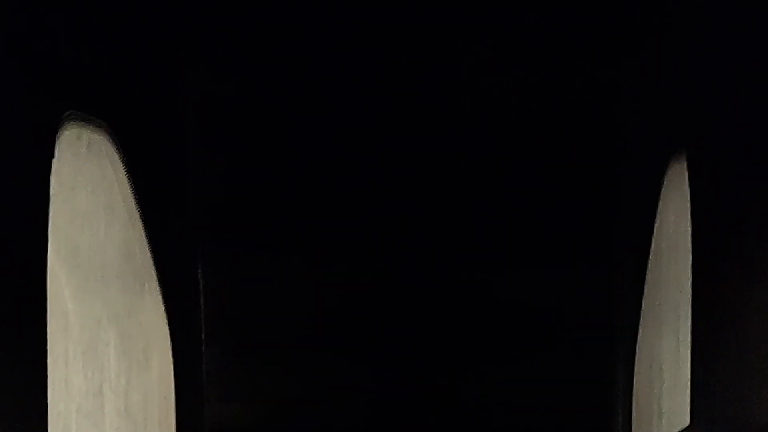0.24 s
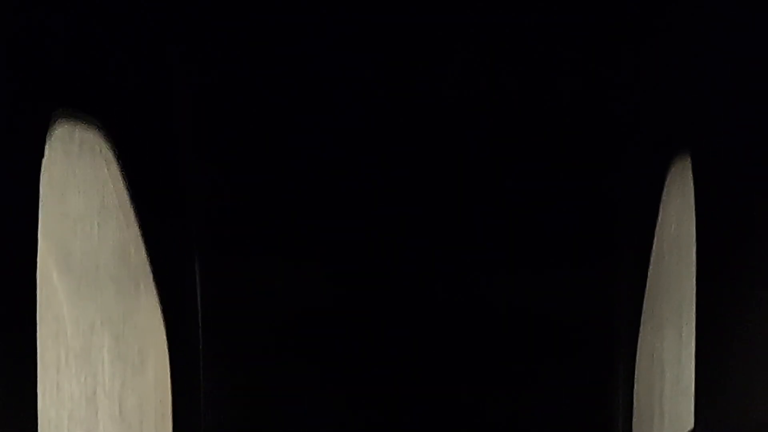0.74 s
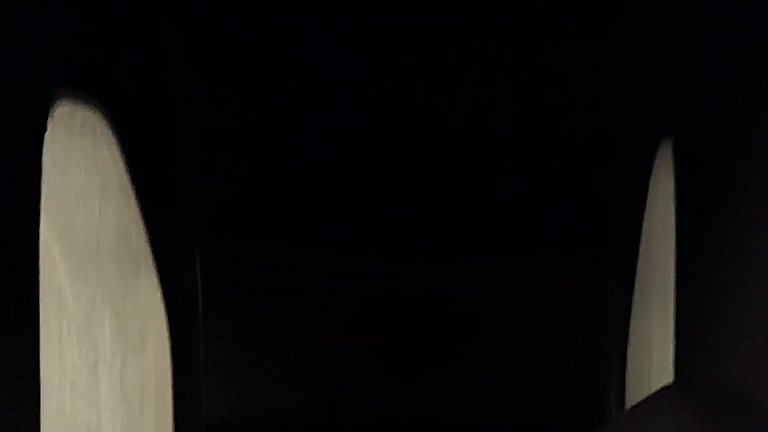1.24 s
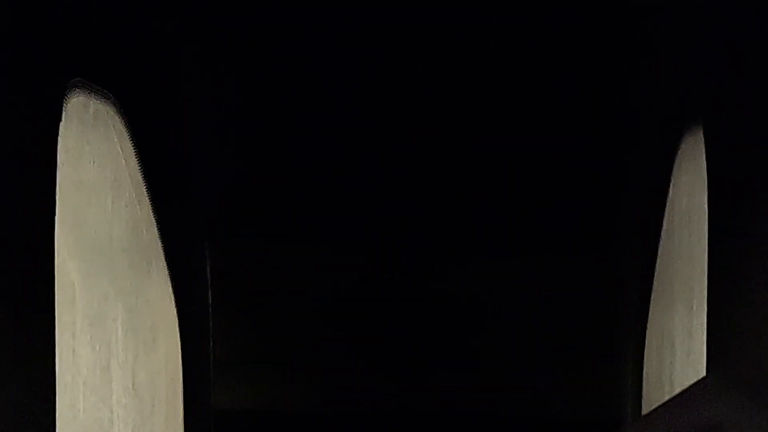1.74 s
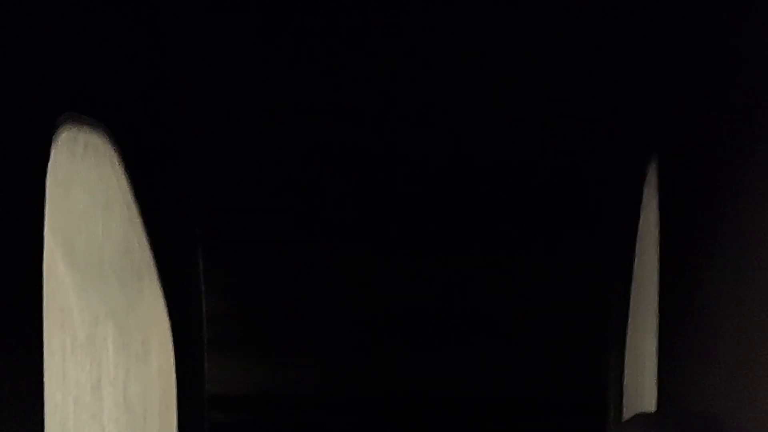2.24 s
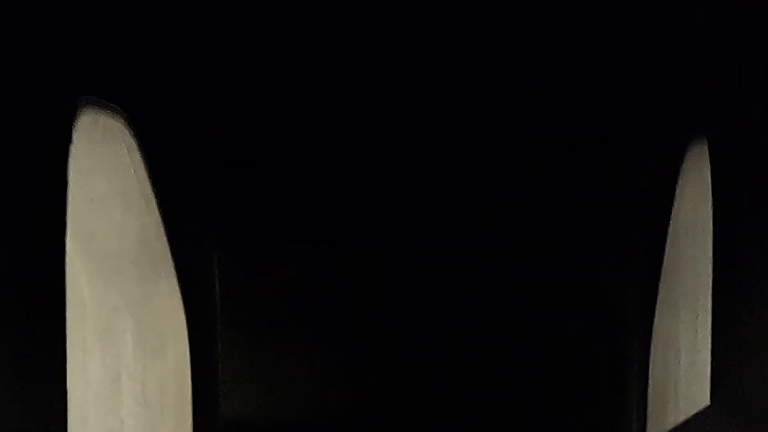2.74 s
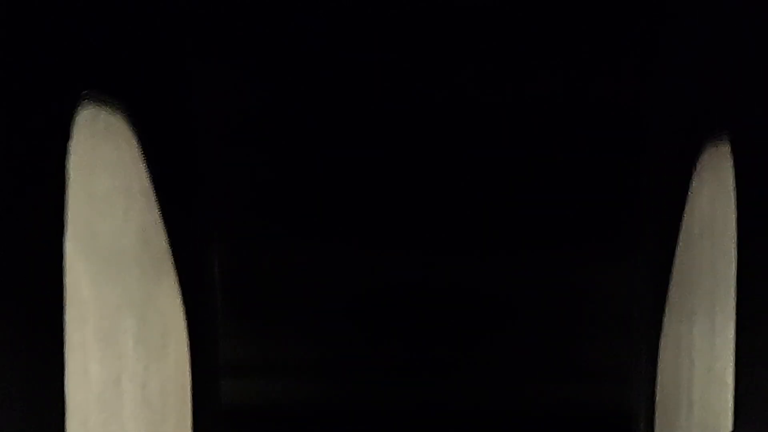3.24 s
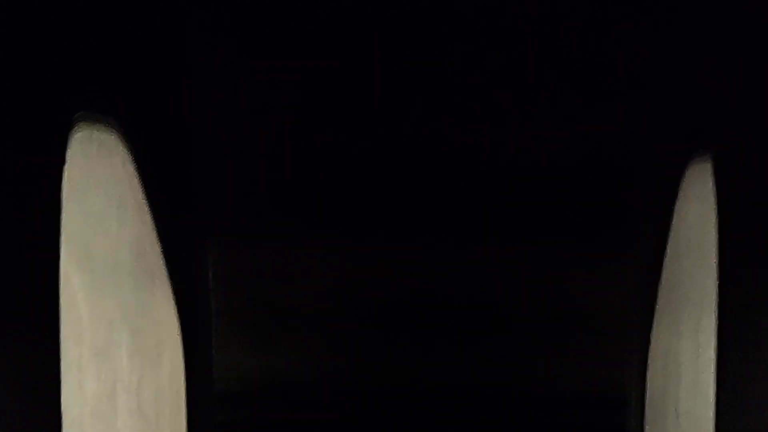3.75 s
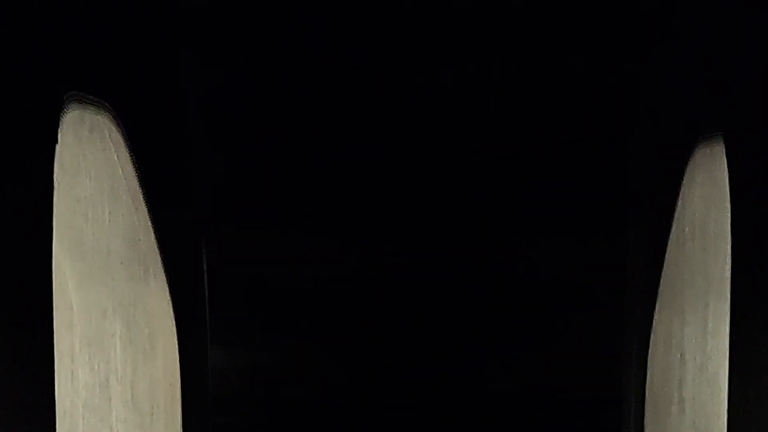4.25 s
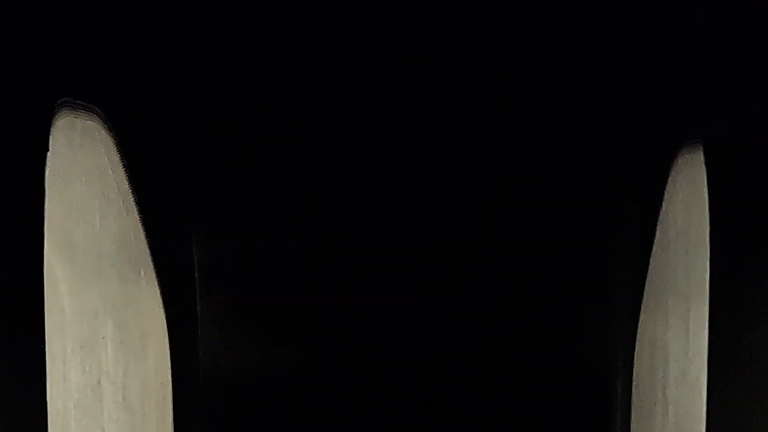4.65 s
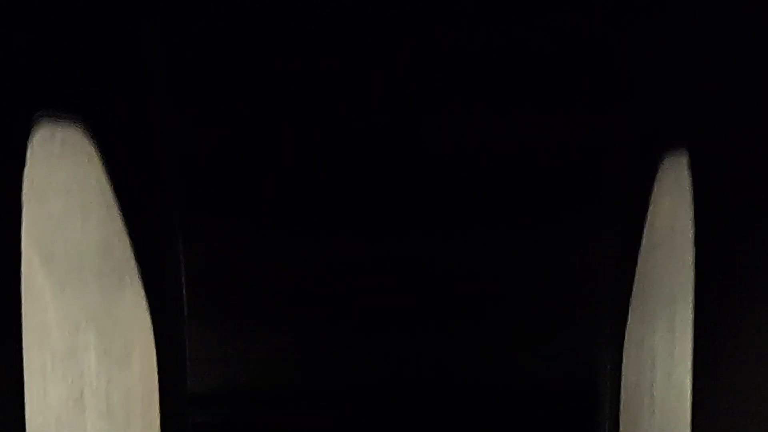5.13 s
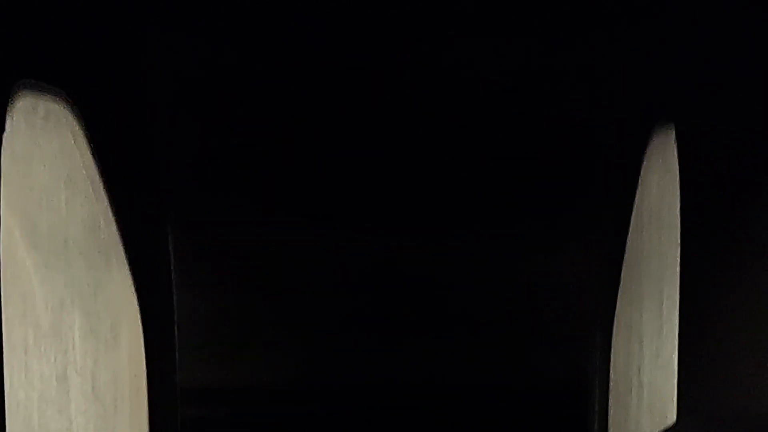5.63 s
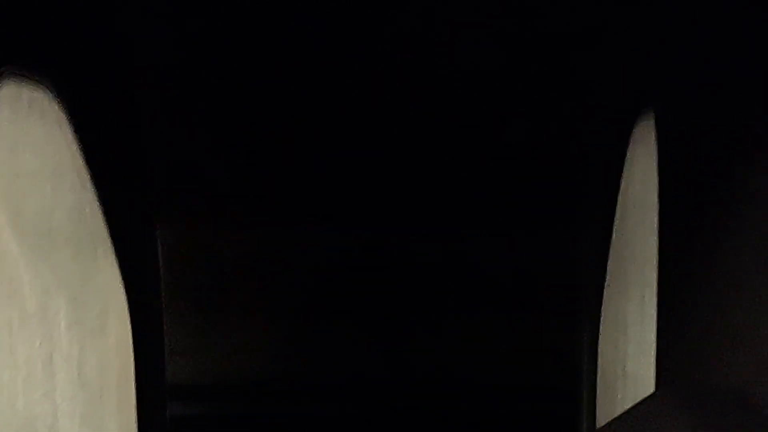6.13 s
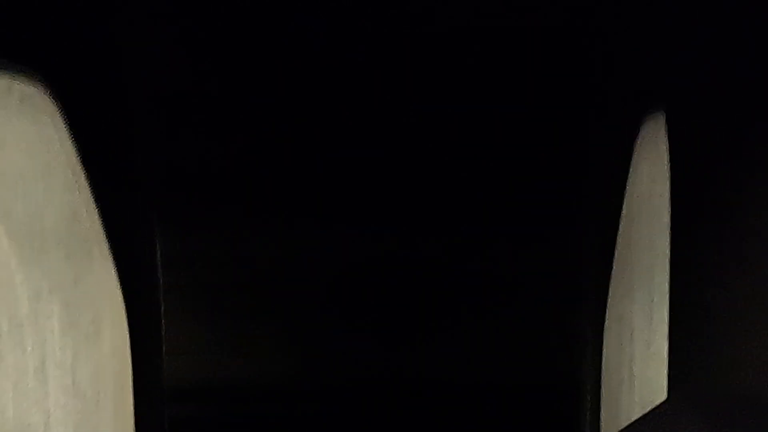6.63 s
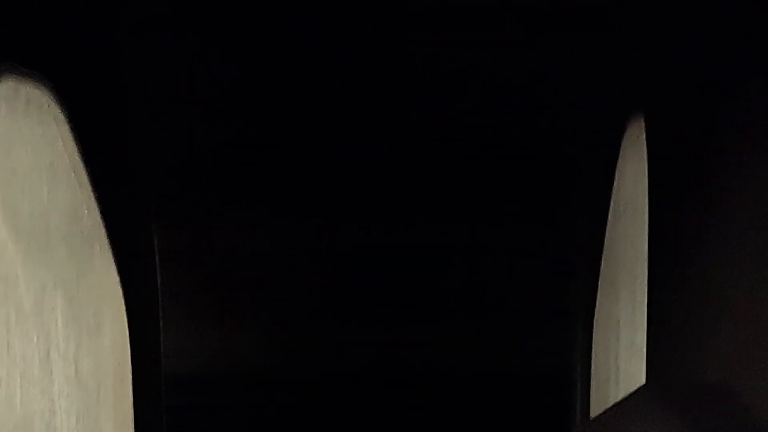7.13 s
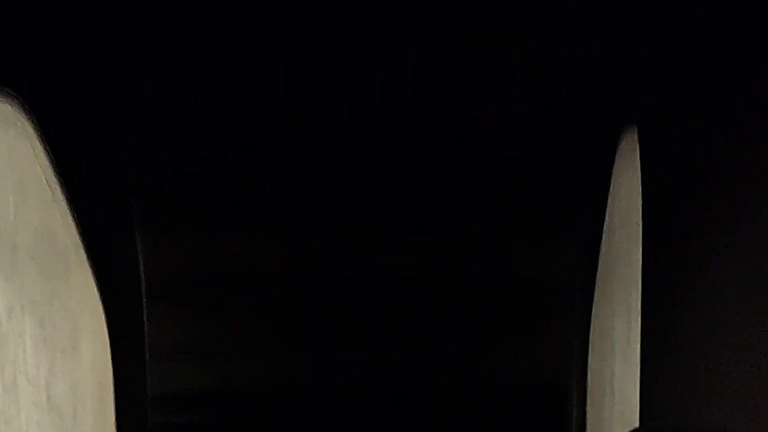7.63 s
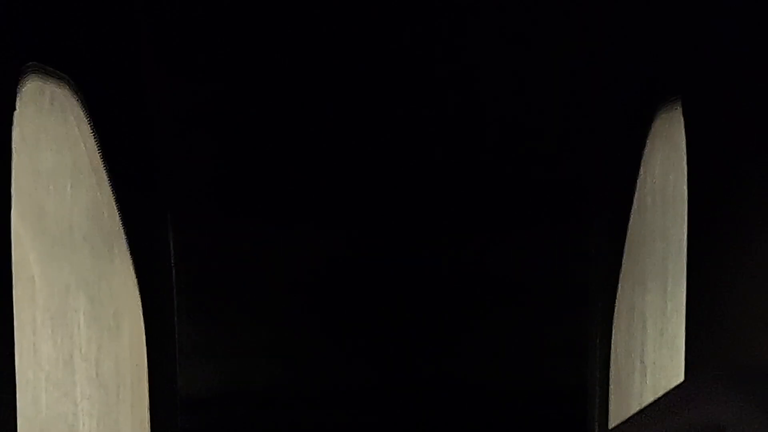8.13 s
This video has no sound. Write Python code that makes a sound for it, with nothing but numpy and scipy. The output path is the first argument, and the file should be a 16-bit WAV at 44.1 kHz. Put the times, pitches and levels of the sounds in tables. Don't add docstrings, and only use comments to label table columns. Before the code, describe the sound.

Inside a subway car running fast through a tunnel. A deep, unsteady rumble and floor boom fill everything from the first instant, with rough wheel roar and a blurred metallic ring above. Thin motor and gear whines surface and sink, air hisses softly, and loose panels tick. A small overloaded microphone briefly ducks the sound under pressure buffets. It ends still at speed.

```python
import sys
import numpy as np
from scipy import signal
from scipy.fft import rfft, irfft, next_fast_len
from scipy.io import wavfile
from scipy.ndimage import uniform_filter1d

SR = 44100
rng = np.random.default_rng(int(sys.argv[2]) if len(sys.argv) > 2 else 0)


def persist_wave(psi):
    counts = np.round(np.clip(psi, -1, 1) * 32767).astype(np.int16)
    wavfile.write(sys.argv[1], SR, np.atleast_2d(counts).T)


def field_ratio(decibels):
    return 10 ** (np.asarray(decibels, dtype=float) / 20)


N = 369558
STEADY_SHARE = 0.65


def rms_one(x):
    return x / np.sqrt(np.mean(x ** 2) + 1e-20)


def in_time(rows):
    s, *columns = np.transpose(rows)
    return [np.interp(np.arange(N) / SR, s, column) for column in columns]


def swells(s, length_s, db):
    t = np.arange(0, N + 200, 200) / SR
    bells = np.exp(-np.log(16) * ((t[:, None] - s) / length_s) ** 2)
    return np.interp(np.arange(N) / SR, t, bells @ db)


def swells_of(rows):
    return swells(*np.transpose(rows))


def drift(rate):
    r = np.exp(-80 * np.pi * rate / SR)
    coarse = rng.standard_normal(N // 40 + 2002)
    slow = signal.lfilter([1], [1, -2 * r, r * r], coarse)[2000:]
    return np.interp(np.arange(N) / 40, np.arange(len(slow)), rms_one(slow - slow.mean()))


def resonate(x, hz, width_hz):
    r = np.exp(-np.pi * width_hz / SR)
    zeros = np.array([1, 0, -1]) * (1 - r * r) / 2
    return signal.lfilter(zeros, [1, -2 * r * np.cos(2 * np.pi * hz / SR), r * r], x)


def resonate_twice(x, hz, width_hz):
    return resonate(resonate(x, hz, width_hz), hz, width_hz)


def steadied(x, share):
    power = uniform_filter1d(uniform_filter1d(x * x, size=3000), size=3000)
    return x * (power.mean() / (power + 1e-30)) ** (share / 2)


def coloured(spectrum, patchy_db, count, share=0):
    size = next_fast_len(N)
    hz, level_db = np.transpose(spectrum)
    pitch = np.log(np.maximum(np.arange(size // 2 + 1) * SR / size, 1))
    gain = field_ratio(np.interp(pitch, np.log(hz), level_db, left=-90, right=-90))
    shaped = rfft(rng.standard_normal(size)) * gain
    place = (pitch - np.log(hz[0])) / np.log(hz[-1] / hz[0]) * (count - 1)
    total = np.zeros(N)
    for k in range(count):
        band = irfft(shaped * np.clip(1 - abs(place - k), 0, 1), size)[:N]
        if share:
            band = steadied(band, share)
        total += band * field_ratio(patchy_db * drift(9.1))
    return rms_one(total)


def through_walls(x, cut_hz):
    return signal.sosfilt(signal.butter(4, cut_hz, fs=SR, output="sos"), x)


def wavering(hz, level_db, tremble_hz, beat_db):
    phase = 2 * np.pi * np.cumsum(hz + tremble_hz * drift(14.66)) / SR
    return field_ratio(level_db + beat_db * drift(12)) * np.sqrt(2) * np.sin(phase)


# (frequency [Hz], density [dB per Hz])
HISS_SPECTRUM = [(1200, -11), (2300, 0.5), (3200, -1.5), (4500, -16), (5500, -14.5), (7000, -23.5),
                 (8000, -27.5), (9000, -36), (12000, -47.5), (12700, -55), (13500, -66.5)]


def air_hiss(draught_db):
    return field_ratio(-40 + draught_db) * coloured(HISS_SPECTRUM, patchy_db=0.7, count=4)


# (time [s], pitch [Hz])
MOTOR_PITCH = [(0, 1910), (1.3, 1890), (2.9, 1873), (4.45, 1876), (5.5, 1866), (6.0, 1874), (6.5, 1866),
               (7.7, 1887), (8.38, 1863)]
# (time [s], length [s], level [dB])
MOTOR_PULLS = [
    (.2, .5, 3),
    (1.35, 0.65, 8.5),
    (2.194, 0.28, 11),
    (2.85, 0.44, 10),
    (4.46, 0.22, 11.5),
    (4.797, 0.37, 10.5),
    (5.42, 0.28, 7),
    (5.68, .2, 6),
    (6.55, .3, 8),
    (7.7, 0.18, 9.5),
]


def motor():
    pitch_hz, = in_time(MOTOR_PITCH)
    return wavering(pitch_hz, -44.5 + swells_of(MOTOR_PULLS), tremble_hz=7, beat_db=2.5)


GEAR_REST_DB = [-44, -44.5, -49, -52]
# (time [s], length [s], level [dB])
GEAR_MESHES = [
    [(.2, .9, 2.5), (.95, .4, 3.5), (2.0, 0.73, 2.5), (2.5, 0.5, 4), (3.25, 0.21, 1), (4.55, .5, 5),
     (6.4, 0.57, 0), (7.8, .5, 5)],
    [(.3, 0.47, 16), (.85, 0.59, 8.5), (2.3, 0.91, 9), (4.55, 0.6, 13.5), (5.55, 0.37, 10),
     (6.45, 0.81, 8.5), (7.7, 0.31, 15.5), (8.1, 0.36, 2)],
    [(.4, .3, 3), (2.4, 0.64, 7), (5.85, .25, 7.5), (6.8, 0.56, 16), (7.35, .2, 11), (7.7, 0.53, 11)],
    [(1.0, 1, 10), (2.6, 0.45, 9), (4.7, 0.75, 11.5), (5.4, 0.42, 14.5)],
]
# (frequency [Hz], width [Hz], group [index])
GEAR_TONES = [(450, 8, 0), (518, 8, 0), (584, 9, 1), (622, 8, 0), (948, 8, 2), (1188, 14, 3), (1220, 14, 3)]


def gears():
    levels_db = [rest_db + swells_of(rows) for rest_db, rows in zip(GEAR_REST_DB, GEAR_MESHES)]
    tones = 0
    for hz, width_hz, group in GEAR_TONES:
        tones = tones + wavering(hz, levels_db[group], tremble_hz=width_hz * 0.75, beat_db=2.5)
    return tones


# (frequency [Hz], width [Hz], resting level [dB])
WALL_MODES = [(747, 150, -37), (967, 210, -41)]
# (time [s], length [s], level [dB])
WALL_DRONES = [
    [(.47, .1, 12), (.66, .1, 12.5), (1.05, .15, 7), (1.2, .08, 10), (2.05, .25, 9), (2.6, .1, 4),
     (3.85, .1, 14), (4.55, .15, 7), (4.85, .1, 2), (5.07, .15, 9.5), (5.5, .1, 4), (6.1, .15, 0),
     (7.25, .1, 10), (7.9, .15, 8), (8.15, .1, 10)],
    [(.4, .2, 7), (3.4, .2, 7), (4.3, .1, 6), (5.0, .2, 1), (5.6, .3, 9.5), (6.2, .3, 8), (6.55, .3, 10.5),
     (6.95, .2, 13.5), (7.3, .4, 7), (7.72, .12, 13), (8.1, .3, 8), (8.32, .1, 11)],
]


def side_walls():
    drones = 0
    for (hz, width_hz, rest_db), rows in zip(WALL_MODES, WALL_DRONES):
        mode = resonate_twice(rng.standard_normal(N), hz, width_hz)
        drones = drones + field_ratio(rest_db + swells_of(rows)) * rms_one(steadied(mode, STEADY_SHARE))
    return drones


# (time [s], length [s], level [dB])
PANEL_DRONES = [(.1, 0.25, 11.5), (.45, .15, -2), (.9, 0.25, 11), (1.3, 0.31, 12.5), (1.602, 0.2, 7.5),
                (1.85, 0.14, 12), (2.52, .14, 8.5), (2.8, 0.16, 3), (3.35, .2, 11.5), (4.9, .2, 8.5),
                (5.05, 0.11, 7), (5.3, 0.12, -1), (5.55, 0.12, 4), (5.88, 0.085, 5), (6.18, 0.067, 12),
                (6.48, .1, 1.5), (6.602, .3, 9), (7.3, 0.17, 5.5), (8.2, .2, -2)]


def floor_panel():
    drone = resonate_twice(rng.standard_normal(N), hz=287.6, width_hz=118)
    return field_ratio(-36 + swells_of(PANEL_DRONES)) * rms_one(steadied(drone, STEADY_SHARE))


# (time [s], panel ring level [dB], upper ring level [dB], buzz [ms])
PANEL_KNOCKS = [(.107, -17, -34, 6.6), (.385, -16, -34, 5), (.499, -15, -33, 5), (.54, -20, -33, 5),
                (.697, -17, -35, 5), (2.233, -16, -34, 4), (2.495, -11, -34, 4), (2.855, -15, -34, 4),
                (3.842, -14, -33, 4), (5.085, -15, -33, 4), (5.845, -16, -33, 4), (5.898, -16, -34, 4),
                (7.735, -13, -34, 4), (8.3, -20, -33, 4), (1.034, -14, -34, 6), (1.066, -11, -32, 8),
                (1.122, -13, -32, 8), (1.589, -7, -29, 7.2), (2.157, -20, -36, 5), (3.092, -12, -37, 7),
                (3.355, -17, -37, 8), (3.384, -9, -36, 5), (3.448, -13, -33, 3), (3.895, -20, -30, 4),
                (3.967, -16.5, -35, 9), (4.111, -14.5, -29, 3), (4.2, -12, -36, 5), (4.306, -15, -36, 3),
                (5.111, -15, -31, 4), (6.473, -12, -32, 5), (6.669, -20, -32, 5), (6.859, -11, -36, 6),
                (6.987, -16, -27, 3.3), (7.037, -9, -30, 1.6), (7.054, -19, -34, 2), (7.058, -12, -21, 1.8),
                (7.0635, -13, -27, 2), (7.076, -16, -31, 2), (7.087, -14, -20.5, 1.2), (7.283, -16, -27, 8),
                (7.504, -14, -36, 4)]


def knocks():
    rattle_per_s, rattle_db, rattle_bright_db, rattle_buzz_ms = 70, -36, -17, 2.3
    spread_db = 3 * np.minimum(rng.exponential(1, N), 2.5)
    touched = rng.random(N) < rattle_per_s * field_ratio(5 * drift(2)) / SR
    touches = field_ratio(rattle_db + spread_db) * touched
    fade = np.exp(-1000 / (rattle_buzz_ms * SR))
    panel = signal.lfilter([np.sqrt(1 - fade ** 2)], [1, -fade], touches + 1e-18)
    upper = panel * field_ratio(rattle_bright_db)
    after = np.arange(SR // 20)
    for s, panel_db, upper_db, buzz_ms in PANEL_KNOCKS:
        buzz = np.exp(-1000 * after / (buzz_ms * SR))
        buzz = buzz / np.sqrt(buzz @ buzz)
        at = int(s * SR)
        panel[at:at + len(after)] += field_ratio(panel_db) * buzz
        upper[at:at + len(after)] += field_ratio(upper_db) * buzz
    chatter = rng.choice([-1, 1], (2, N))
    dull = resonate(resonate(panel * chatter[0], 2300, 1800), 2700, 1900)
    bright = resonate(resonate(upper * chatter[1], 4700, 1500), 5200, 2400)
    body = resonate(resonate(panel * chatter[1], 1400, 900), 1500, 1200)
    dull = field_ratio(17) * through_walls(dull, cut_hz=4200)
    bright = field_ratio(14) * through_walls(bright, cut_hz=7500)
    body = field_ratio(16.5) * through_walls(body, cut_hz=2600)
    return dull + bright + body


# (frequency [Hz], width [Hz], level [dB])
WHEEL_MODES = [(1730, 230, -6), (1872, 267, 2.5), (3678, 390, -13), (5440, 420, -39.5)]


def wheels(load_db):
    rough = rng.standard_normal(N)
    rings = 0
    for hz, width_hz, db in WHEEL_MODES:
        rings = rings + field_ratio(db + 0.68 * drift(9.2)) * resonate_twice(rough, hz, width_hz * 1.36)
    return field_ratio(-28 + load_db) * rms_one(through_walls(rings, cut_hz=6000))


# (frequency [Hz], density [dB per Hz])
ROAR_SPECTRUM = [(220, -14.5), (380, -1.5), (470, -2), (600, 0), (740, -3.5), (950, -12.5), (1250, -9.5),
                 (1480, -13.5), (2400, -36.5)]
UPPER_SPECTRUM = [(640, -11), (820, 0.5), (950, -2.5), (1100, -5), (1350, -13)]


def rolling_roar(rough_db, boom_db):
    roar_db = -22.5 + 0.2 * rough_db + 0.077 * boom_db
    roar = field_ratio(roar_db) * coloured(ROAR_SPECTRUM, patchy_db=-0.5, count=2)
    upper_db = -30 + 1.4 * rough_db
    return roar + field_ratio(upper_db) * coloured(UPPER_SPECTRUM, patchy_db=-1.0, count=2)


# (frequency [Hz], density [dB per Hz])
HEAVE_SPECTRUM = [(8, -2), (20, -2.5), (40, -2.5), (60, 0), (90, -1.5), (160, -17.5)]
BOOM_SPECTRUM = [(60, -20), (110, 1), (160, -2), (250, -4), (320, -6), (520, -27.5)]
# (time [s], length [s], level [dB])
BODY_SWAYS = [(.08, .12, 2), (.5, .12, -2), (.8, .25, -2.5), (1.17, .1, 6.5), (1.35, .15, -4),
              (1.595, .15, 5), (1.77, .15, 5.5), (2.25, .15, -2), (2.4, .1, 3.5), (2.9, .1, -9),
              (3.05, .15, 1.5), (3.367, .15, 4), (3.6, .12, 3.5), (3.85, 0.11, 9), (4.05, 0.17, -4),
              (4.3, .15, 1), (4.43, .1, 7), (5.0, .1, 3), (5.4, .2, -2), (5.853, .3, 6), (6.55, .2, -7),
              (6.85, .1, 1.5), (7.05, .1, 2), (7.62, .2, 8), (8.05, .15, 6), (8.3, .1, -4)]
# (time [s], length [s], heave level [dB], boom level [dB])
BODY_LURCHES = [(.24, 0.19, -2.5, -0.5), (0.44, 0.17, 0.5, 1), (0.554, 0.13, 1, 3.5), (.75, 0.25, 2.5, -3),
                (0.832, 0.07, -3, 0), (1.02, 0.18, 0, -2), (1.14, .07, -7, 0), (1.27, .22, 2.5, 1.5),
                (1.496, 0.08, -4, -3.5), (1.63, 0.097, -2.5, 3), (1.777, 0.13, -8.5, -2),
                (1.996, 0.085, -2, -9), (2.15, .14, -1.5, 0), (2.3, .15, -1, 0.5), (2.65, 0.26, 1, -4.5),
                (2.9, 0.1, 2, 0.5), (3.07, .14, 2.5, -2.5), (3.17, 0.063, -1, 5.5), (3.24, 0.13, -5, -4),
                (3.433, 0.11, 4, 3.5), (3.6, .16, -5, 1.5), (3.75, .2, -3, -2), (4.103, .14, -0.5, -1.5),
                (4.25, 0.12, 2.5, 3.5), (4.413, 0.11, -6.5, -6), (4.6, .1, -1.5, -1),
                (4.8, 0.25, 0.5, -0.5), (4.9, 0.063, -3, -4), (5.07, .12, 0.5, 2.5), (5.154, 0.031, 0, -5),
                (5.292, 0.24, -2, 4.5), (5.56, .16, 1, 2.5), (5.717, .08, -3, 2), (5.885, 0.093, -7.5, 2),
                (5.97, .15, 2, -0.5), (6.3, 0.22, -3, -0.5), (6.497, 0.23, 3, -1.5), (6.585, 0.059, -6, -7),
                (6.9, 0.24, 1.5, -1.5), (7.08, 0.11, 0, 1), (7.35, 0.26, -3.5, 2), (7.47, 0.039, -4, -7),
                (7.61, 0.11, -6, 0), (7.76, 0.15, 1, 1.5), (7.835, 0.04, -2.5, -4), (8.002, 0.15, 1.5, -4),
                (8.06, 0.11, -7, -1), (8.218, 0.18, -5, 2.5)]


def lurch_swells():
    s, length_s, heave_db, boom_db = np.transpose(BODY_LURCHES)
    return swells(s, length_s, heave_db), swells(s, length_s, boom_db)


def car_body(heave_db, boom_db):
    drive, sway_hz = 0.43, 58
    pressure = coloured(HEAVE_SPECTRUM, patchy_db=0.1, count=3, share=STEADY_SHARE)
    heave = rms_one(np.tanh(drive * pressure))
    hz = np.arange(N // 2 + 1) * SR / N
    sway = irfft(rfft(heave) / (1 + (hz / sway_hz) ** 8), N)
    heave = heave + sway * (field_ratio(swells_of(BODY_SWAYS)) - 1)
    boom = coloured(BOOM_SPECTRUM, patchy_db=1.0, count=3, share=STEADY_SHARE)
    return field_ratio(-18.5 + heave_db) * heave + field_ratio(-20.5 + boom_db) * boom


# (time [s], rail roughness [dB], wheel load [dB], draught [dB])
TRACK_STATE = [(0, -0.5, -0.5, -0.5), (.4, 1.5, -0.5, 0), (1.1, 1, -0.5, 1.5), (1.75, 0, -1.5, -1),
               (2.2, 0, 0, -0.5), (2.6, -0.5, 0, -1.5), (3.3, 0.5, 0.5, 1.5), (4.25, 0, 0, 0),
               (4.6, -1.5, 0.5, 0.5), (5.0, 0, 0.5, 0), (5.6, 0.5, 0, 0), (5.9, 2.5, 0, 0),
               (6.9, 0, 0.5, .5), (7.3, -2.5, -1.5, 2), (7.7, 3, -0.5, 1.5), (8.05, -2, -1, .5),
               (8.38, 3, -1, 1)]


def scene():
    rough_db, load_db, draught_db = in_time(TRACK_STATE)
    heave_db, boom_db = lurch_swells()
    car = air_hiss(draught_db) + motor() + gears()
    car = car + side_walls() + floor_panel() + knocks()
    car = car + wheels(load_db) + rolling_roar(rough_db, boom_db) + car_body(heave_db, boom_db)
    judder = field_ratio(0.55 * drift(6.1))
    return (car * judder)[None]


# (time [s], ducking [dB])
PRESSURE_BUFFETS = [(0.021, 0.5), (.55, 5.5), (1.22, 0.5), (1.675, 3), (1.952, 3.5), (2.33, 1),
                    (3.181, 2.5), (3.41, -1), (4.91, 2), (5.12, 1), (5.68, 1.5), (5.949, 1.5), (7.43, 0.5),
                    (7.8, 1), (8.25, 1)]


def limiter_db(x):
    ceiling_db, release_db_per_s, buffet_release_s = -5.5, 54.5, 0.035
    t = np.arange(N) / SR
    over_db = np.maximum(20 * np.log10(abs(x) + 1e-9) - ceiling_db, 0)
    held_db = np.maximum.accumulate(over_db + release_db_per_s * t) - release_db_per_s * t
    recovery = np.exp(-(t[:SR // 5] / buffet_release_s) ** 2)
    for s, depth_db in PRESSURE_BUFFETS:
        after = held_db[round(s * SR):][:len(recovery)]
        after += depth_db * recovery[:len(after)]
    return uniform_filter1d(held_db, size=130)


def top_cut(x):
    return signal.sosfilt(signal.butter(12, 13415, fs=SR, output="sos"), x)


def record(dry):
    opening = np.minimum(np.arange(N) / (0.0008 * SR), 1)
    mix = dry * opening * field_ratio(-limiter_db(dry[0]))
    return top_cut(mix)


dry = scene()
out = record(dry)
persist_wave(out)
```